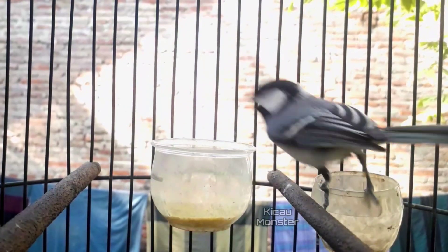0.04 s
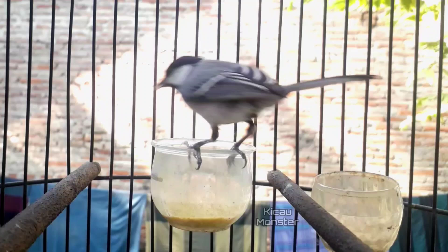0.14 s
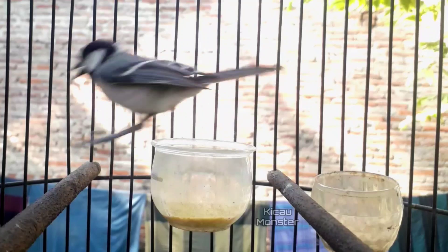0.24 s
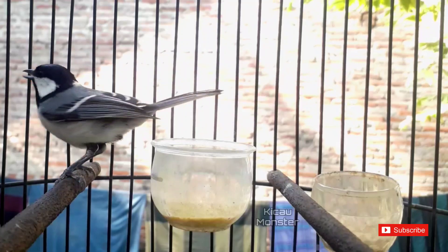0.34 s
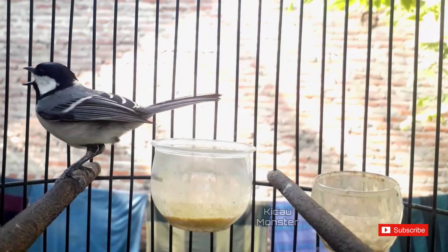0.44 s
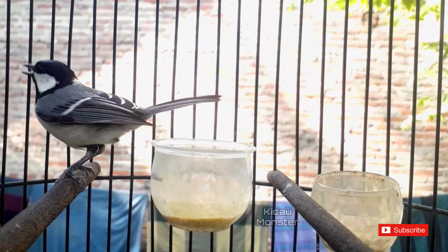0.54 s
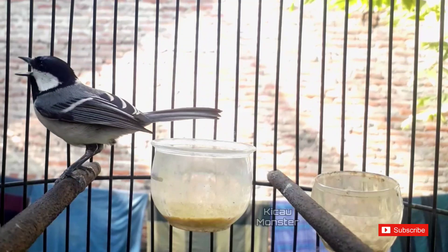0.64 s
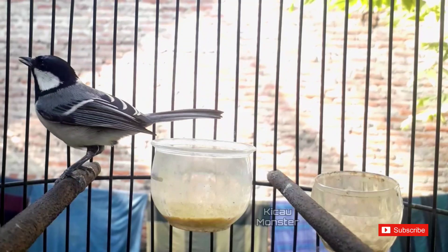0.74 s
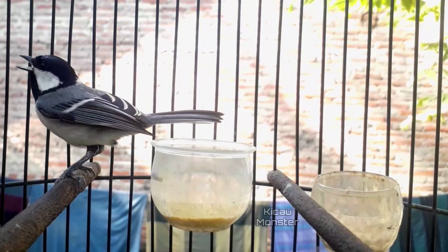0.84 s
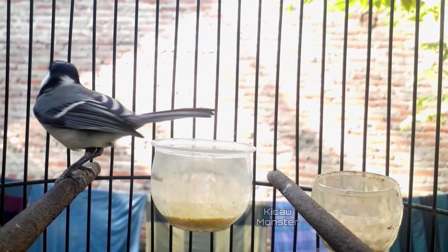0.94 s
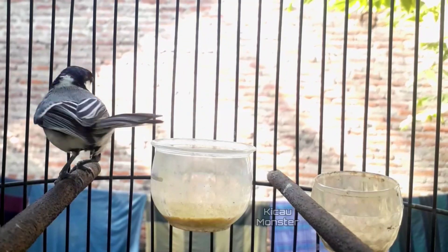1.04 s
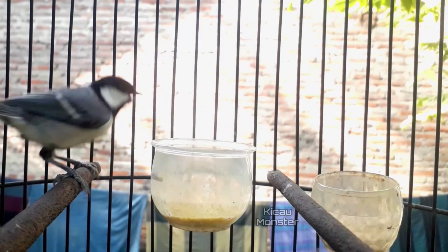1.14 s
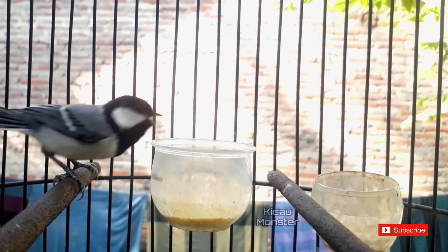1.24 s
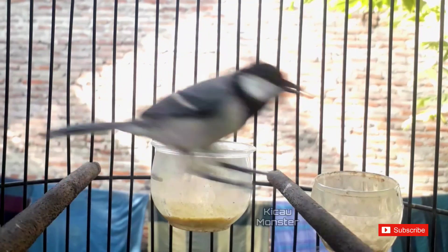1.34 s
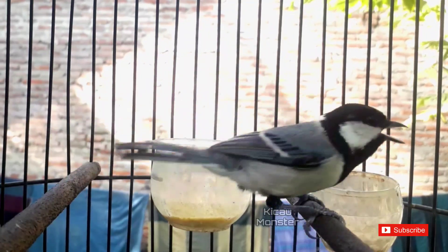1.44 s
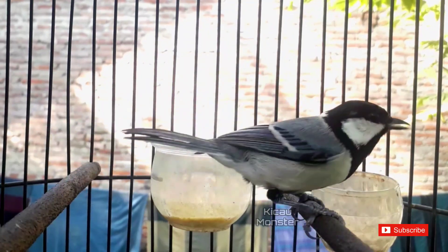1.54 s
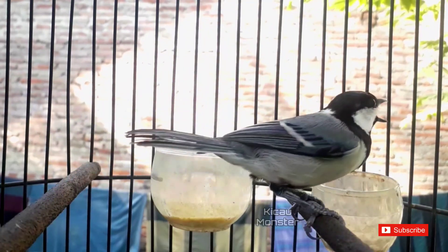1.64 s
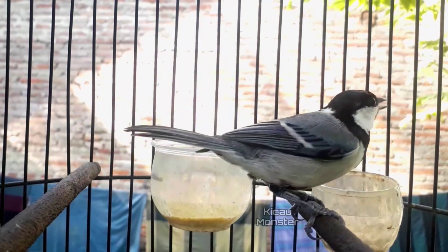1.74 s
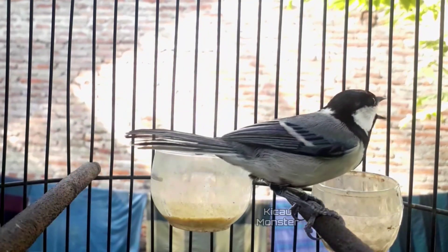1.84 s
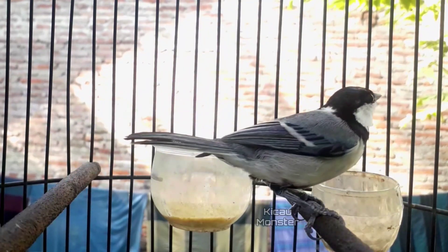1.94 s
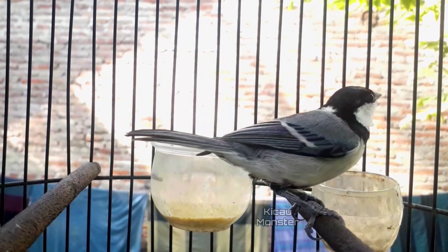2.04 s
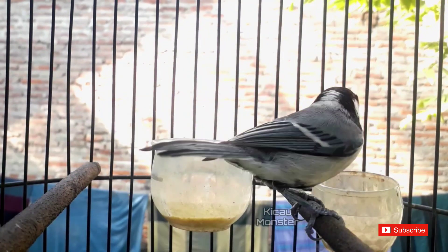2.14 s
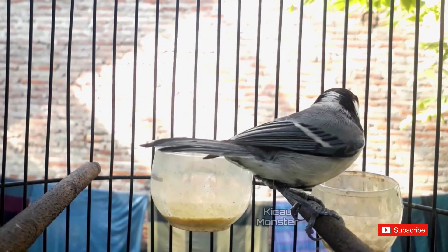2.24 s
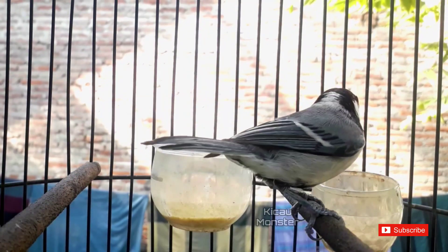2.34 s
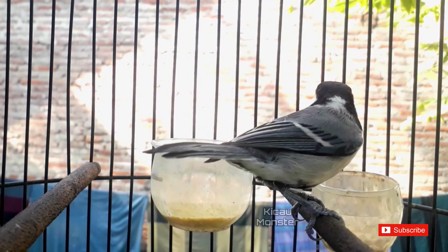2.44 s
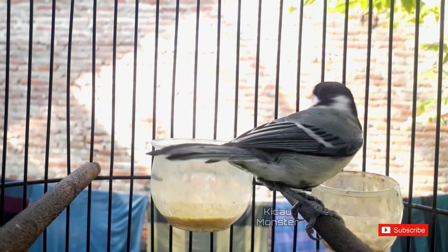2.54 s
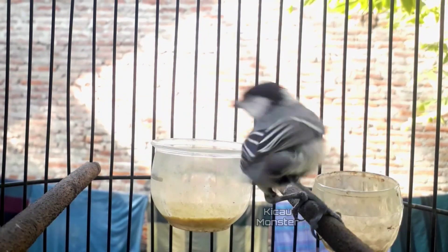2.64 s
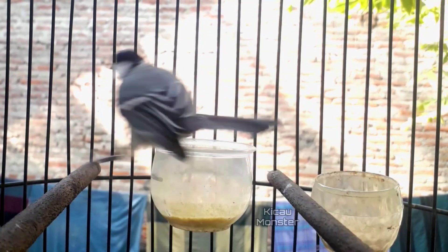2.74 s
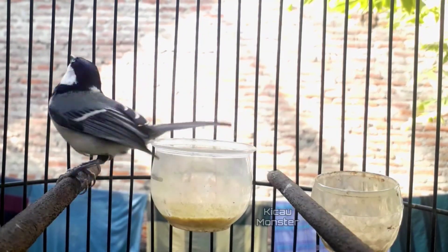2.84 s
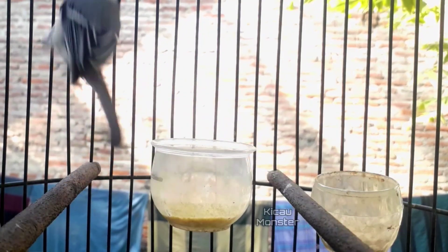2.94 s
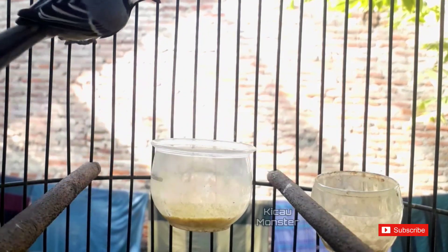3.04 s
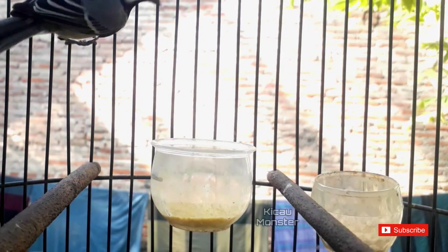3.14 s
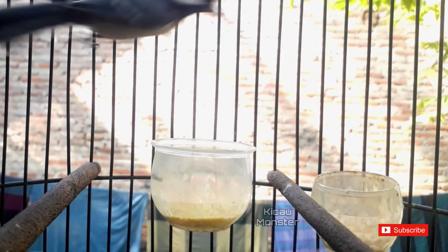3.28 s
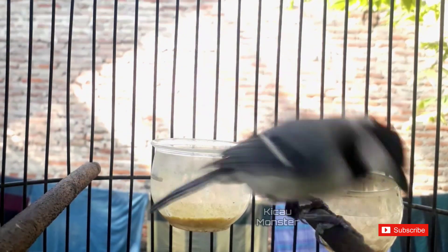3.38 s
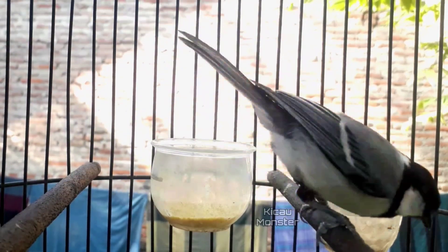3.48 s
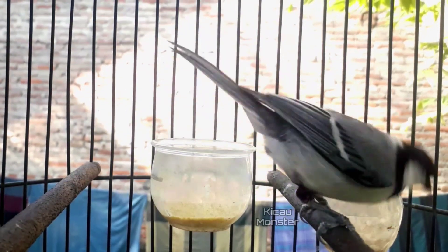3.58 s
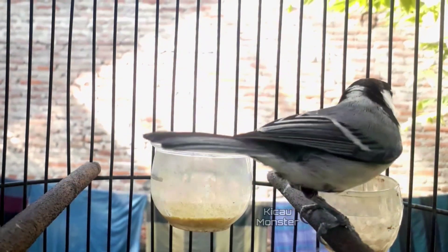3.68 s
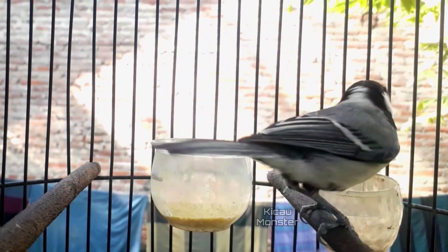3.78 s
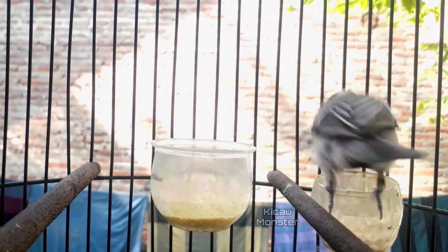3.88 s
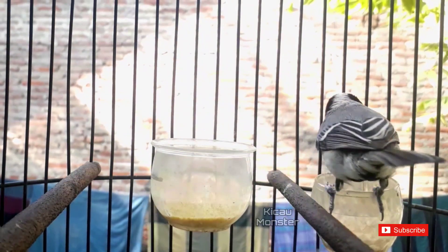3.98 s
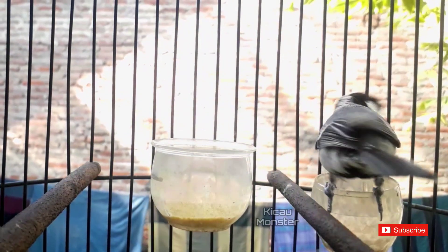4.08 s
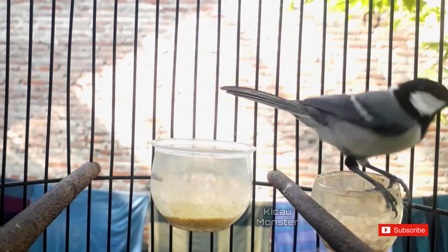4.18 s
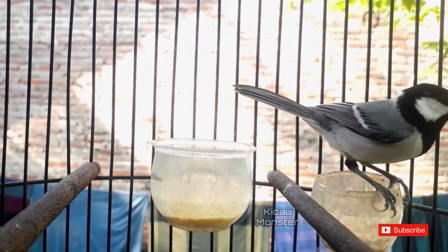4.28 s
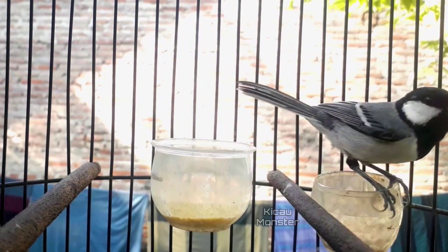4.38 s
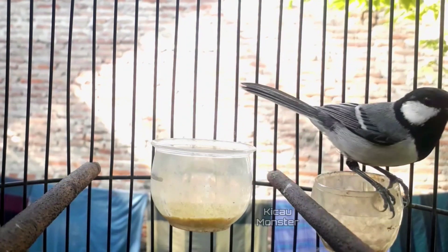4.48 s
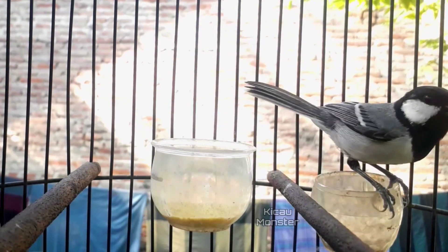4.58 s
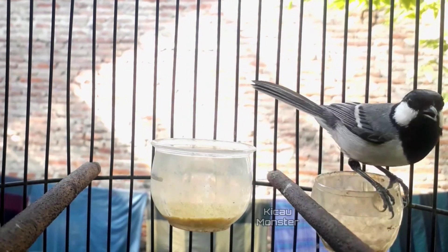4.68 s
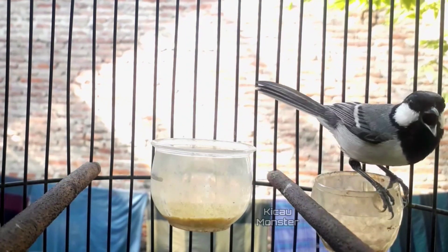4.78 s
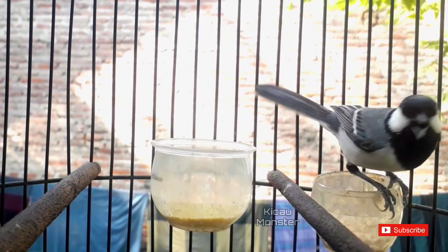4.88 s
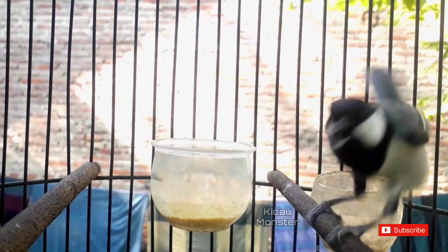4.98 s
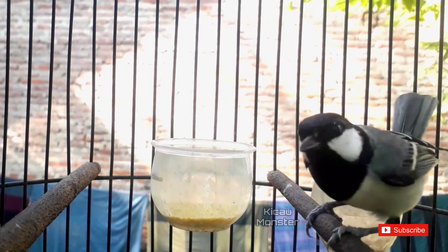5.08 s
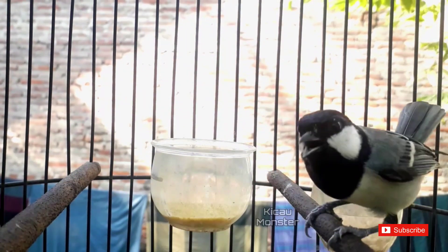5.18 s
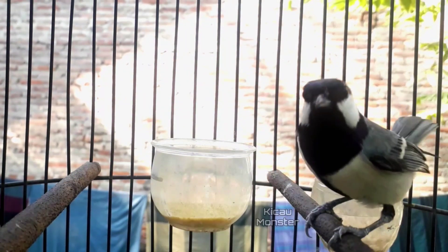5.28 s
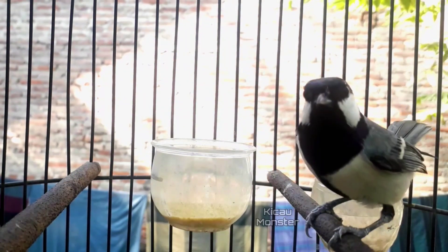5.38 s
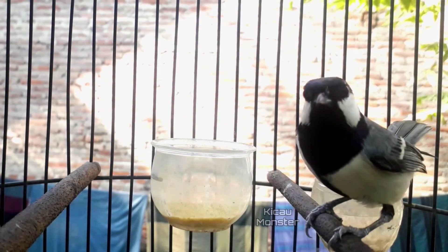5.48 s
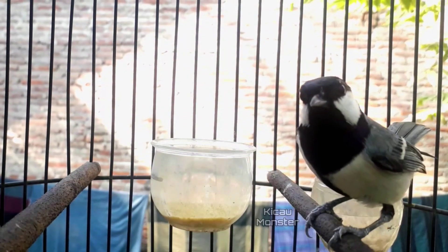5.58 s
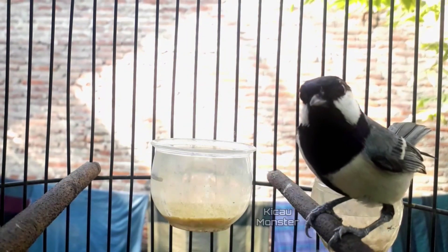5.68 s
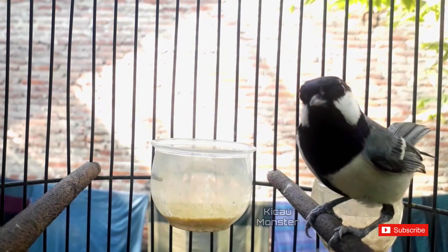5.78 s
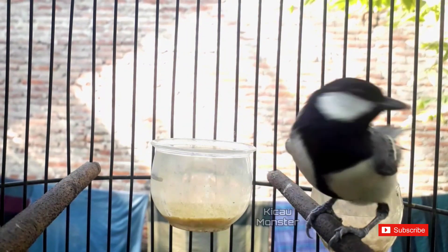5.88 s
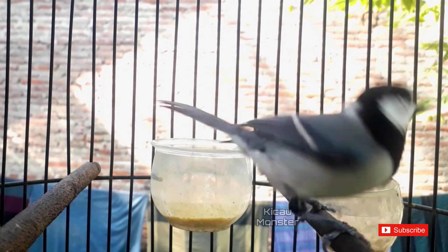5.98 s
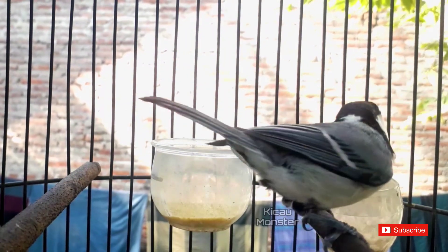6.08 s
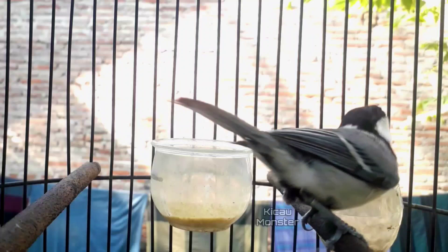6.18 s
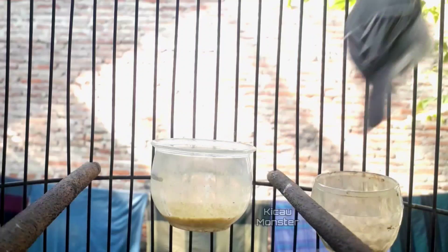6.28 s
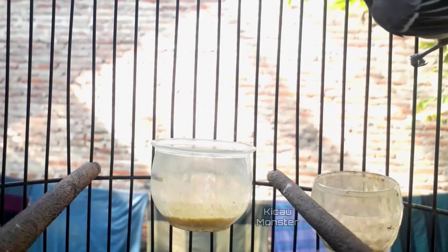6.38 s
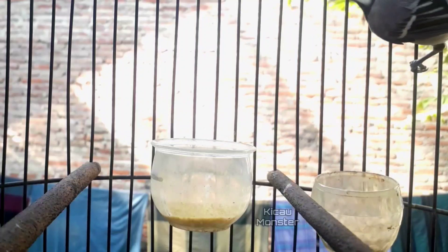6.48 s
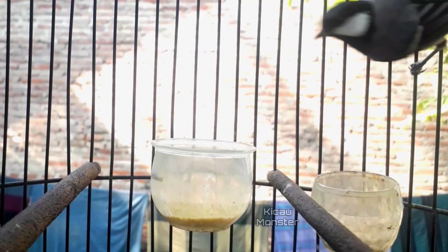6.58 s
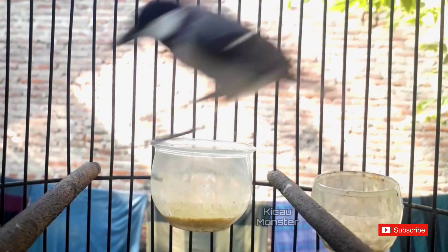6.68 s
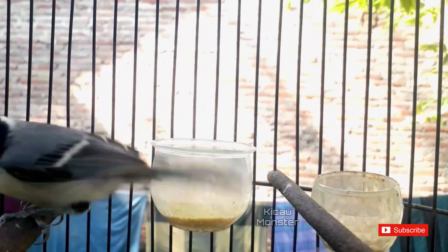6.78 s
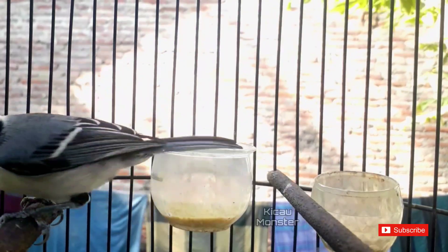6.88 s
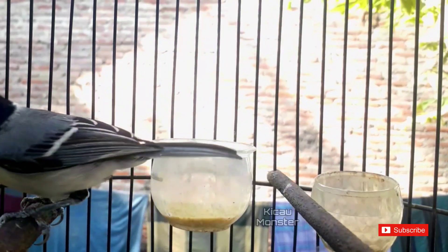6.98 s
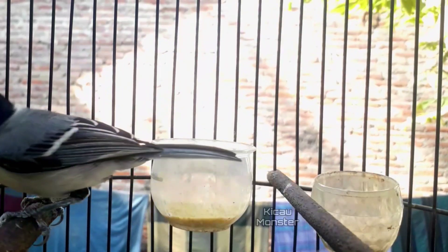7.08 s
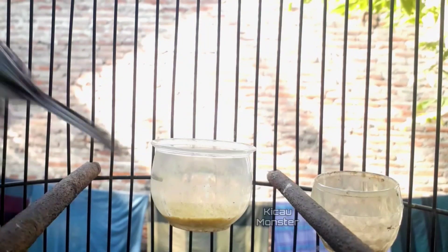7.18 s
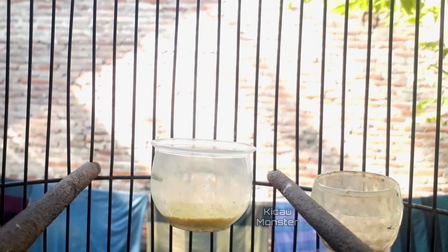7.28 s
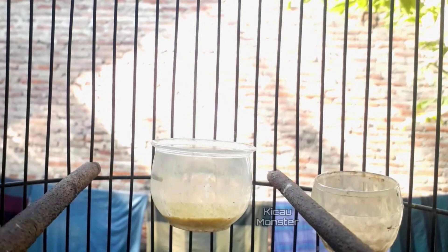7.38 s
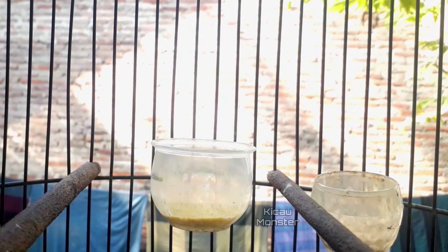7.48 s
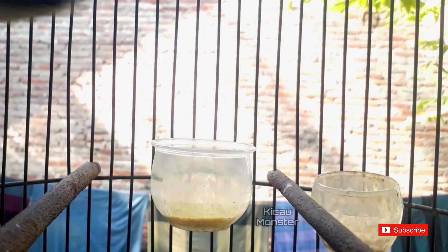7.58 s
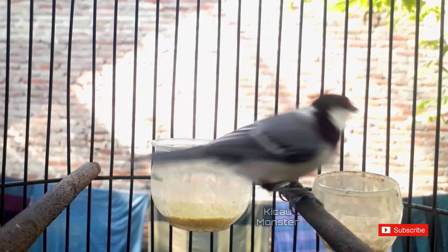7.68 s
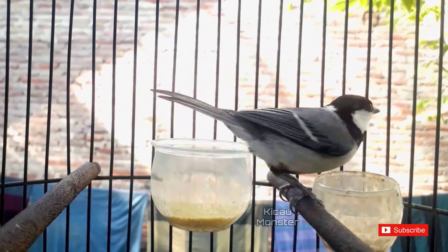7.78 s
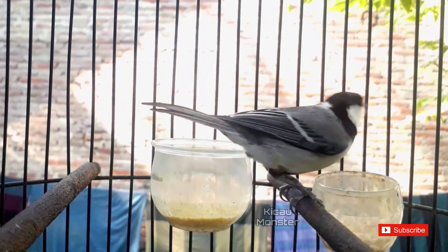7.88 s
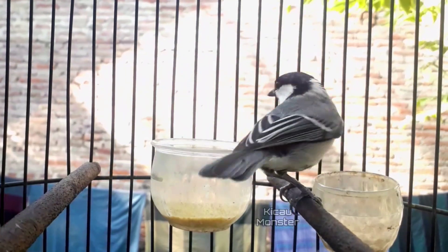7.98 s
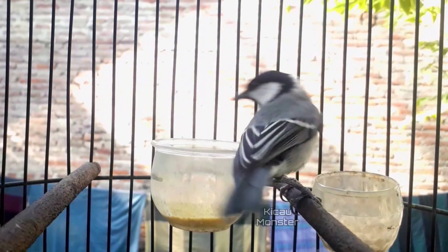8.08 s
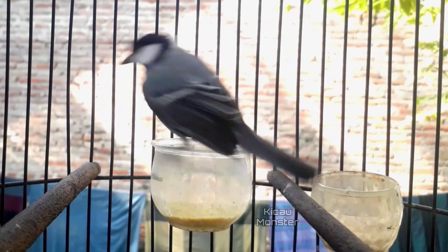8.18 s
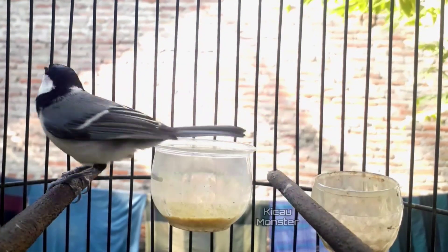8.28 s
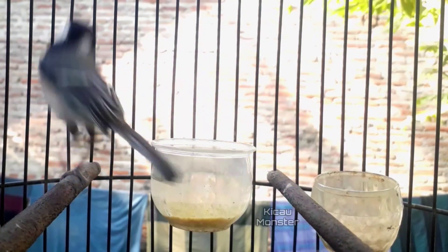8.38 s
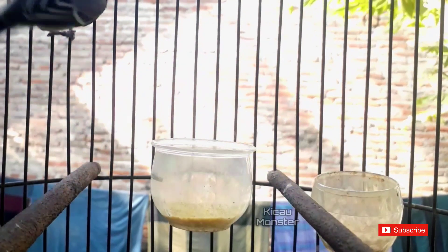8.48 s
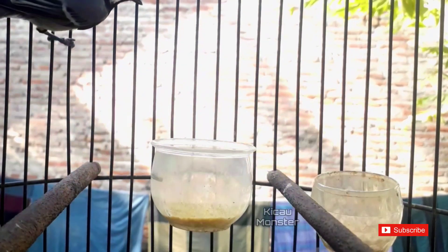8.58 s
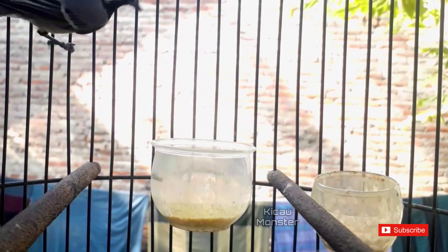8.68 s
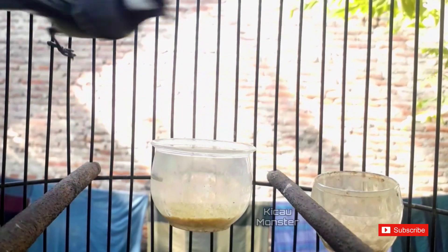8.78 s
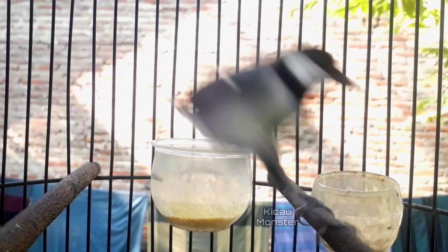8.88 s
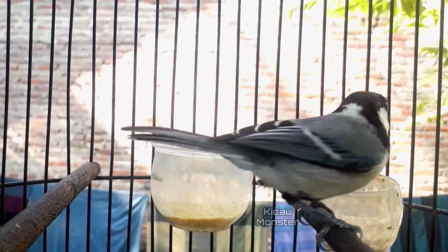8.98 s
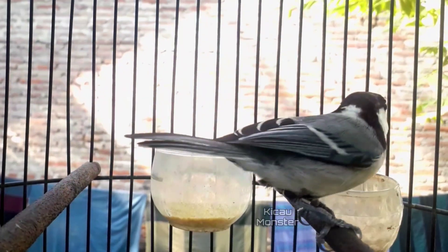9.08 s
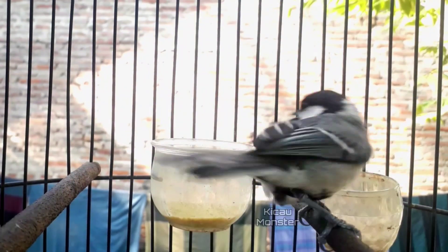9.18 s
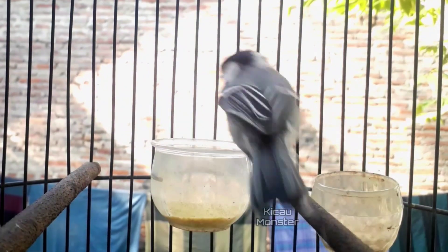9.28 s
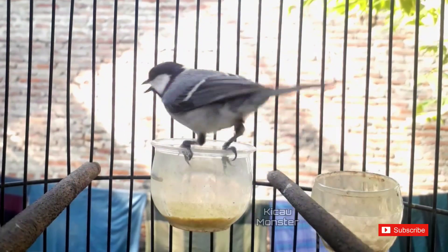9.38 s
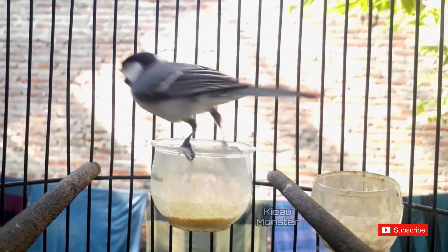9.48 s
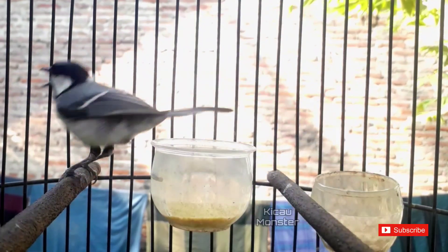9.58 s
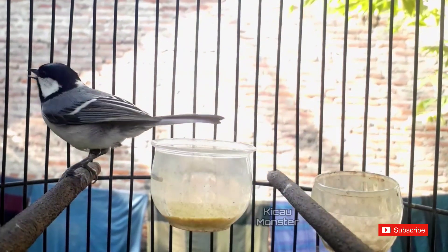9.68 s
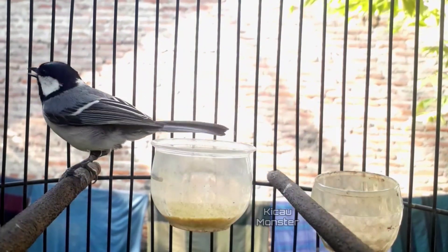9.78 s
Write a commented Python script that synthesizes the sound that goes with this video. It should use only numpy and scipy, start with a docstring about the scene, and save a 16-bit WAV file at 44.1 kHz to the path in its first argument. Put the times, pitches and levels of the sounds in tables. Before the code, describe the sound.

A small bird in a wire cage whistles a high, sliding three-note phrase three times, very close to the microphone and slightly distorted. It pauses and hops about, knocking the perches and shaking the wires, then sings for another second. More hops and a few claw ticks follow while two birds call faintly far off. It sings once more at the end. Soft yard rumble and leaf hiss continue underneath.

```python
"""Over yard rumble and leaf hiss, a tit in a wire cage whistles a three-note phrase again and again,
so close to a phone that the left microphone clips. Its hops knock the perches and shake the wires.
After 2 s it pauses; a claw ticks on wire, a low hum swells, and at 4.4 s it sings for a second.
Two far birds call from 6.5 s among more hops and ticks, and at 9 s the tit sings once more."""
import sys
import numpy as np
from scipy import signal
from scipy.fft import rfft, irfft
from scipy.io import wavfile
from scipy.ndimage import uniform_filter1d

SR = 44100
rng = np.random.default_rng(int(sys.argv[2]) if len(sys.argv) > 2 else 0)


def materialize(psi):
    """Save the field psi as 16-bit PCM at rate SR to the path in sys.argv[1].

    A 1-D psi becomes a single channel; in a 2-D psi each row is a channel.
    """
    bounded = np.clip(np.atleast_2d(psi).T, -1, 1)
    quanta = np.round(bounded * 32767).astype(np.int16)
    wavfile.write(sys.argv[1], SR, quanta)


N = 433503


def undb(db):
    """Turn decibels into a factor to multiply by."""
    return 10 ** (np.asarray(db) / 20)


def unit(x):
    """Scale a signal to an average power of 1."""
    return x / np.sqrt(np.mean(x ** 2))


def smooth(x, samples):
    """Round off corners by averaging twice."""
    return uniform_filter1d(uniform_filter1d(x, samples), samples)


def wander(rate_hz):
    """A smooth random curve, mostly within -1 to 1, that heads for rate_hz new values a second."""
    hold = int(SR / rate_hz)
    steps = np.repeat(rng.standard_normal(N // hold + 1), hold)
    return 1.15 * smooth(steps, hold)[:N]


def ring(x, modes):
    """Let x ring at each mode, a pitch that a thing likes to shake at: f/Hz, width/Hz, level/dB."""
    rings = []
    for hz, width, db in modes:
        peak = signal.iirpeak(hz, hz / width, SR)
        rings.append(undb(db) * unit(signal.lfilter(*peak, signal.lfilter(*peak, x))))
    return np.array(rings)


def glide(rows, smooth_s):
    """Join a note's points smoothly; give its sample numbers, pitch and gains, faded at both ends."""
    times, *columns = np.transpose(rows)
    span = np.arange(int(times[0] * SR), int(times[-1] * SR))
    hz, *levels = (smooth(np.interp(span / SR, times, c), int(smooth_s * SR)) for c in columns)
    return span, hz, undb(levels) * signal.windows.tukey(len(span), .06)


def stereo_noise(spectrum, flicker_db=1.5, lag_samples=19):
    """Flickering noise: each side has its own part, plus a shared part that reaches the right first."""
    freqs = np.maximum(np.fft.rfftfreq(N + 1, 1 / SR), 1)
    hz, db, pan_db, likeness = np.transpose(spectrum)
    curve = lambda values, edge=None: np.interp(np.log(freqs), np.log(hz), values, edge, edge)
    flicker = undb(flicker_db * np.append(wander(11), 0))
    shared, *own = rfft(rng.standard_normal((3, N + 1)) * flicker)
    shared = np.array([shared * np.exp(-2j * np.pi * freqs * lag_samples / SR), shared])
    mix = np.sqrt(curve(likeness)) * shared + np.sqrt(1 - curve(likeness)) * np.array(own)
    colour = undb(curve(db, edge=-78) + np.array([curve(pan_db), -curve(pan_db)]) / 2)
    return unit(irfft(mix * colour)[:, :N])


def yard():
    """Street rumble, cage sway, a mid-pitched rush and leaf hiss, heard at levels that rise and fall."""
    # how loud each layer is: t/s, rumble/dB, sway/dB, rush/dB, hiss/dB
    background_levels = [(0.0, -40.5, -44.5, -39.5, -35.5), (0.3, -48.5, -49, -48.5, -42.5),
                         (0.55, -49.5, -49.5, -53.5, -56), (0.93, -51, -54, -46, -43),
                         (1.67, -49.5, -48.5, -49, -48), (2.3, -58, -64, -55.5, -54.5),
                         (3.12, -54, -53.5, -52, -51.5), (3.86, -54.5, -55.5, -54, -51),
                         (4.5, -54.5, -59, -50, -42.5), (4.9, -52, -56.5, -58, -61),
                         (5.39, -60.5, -60, -64, -67.5), (5.66, -64.5, -63, -65, -67.5),
                         (5.9, -62.5, -62.5, -62, -56.5), (6.4, -60, -56, -56.5, -52),
                         (7.31, -60.5, -55.5, -56.5, -50.5), (7.62, -57, -48, -51.5, -48.5),
                         (7.88, -51.5, -44, -49.5, -43.5), (8.36, -45.5, -39.5, -44, -39),
                         (8.62, -47, -39, -51, -50.5), (8.95, -43, -41, -48.5, -49),
                         (9.2, -53, -54.5, -53, -47.5), (9.83, -50.5, -51, -47, -39.5)]
    # each layer's tone: f/Hz, relative level/dB, left minus right/dB, likeness of the sides (0-1)
    rumble = [(30, -24, -0.5, .9), (60, -4.5, -1.5, .85), (162, -6.5, -1, 0.9), (262, -13, -1, .6),
              (500, -30, -2.5, .5)]
    sway = [(109, -15.5, -7, .4), (224, -2, -12.5, .3), (350, -1, -10, 0.11), (497, -1.5, -9.5, .3),
            (580, -17, -5, .2), (1130, -16, -5.5, .2), (1410, -22, -4, .2)]
    rush = [(556, -10.5, -8, 0.33), (1050, -10, 0, .3), (1720, -10.5, -0.5, .3), (1980, -5, -3.5, 0.25),
            (2600, -2.5, 5, 0.1), (3383, -8, -1, 0.19), (4600, -12, -1.5, .1)]
    hiss = [(3240, -10.5, 0, .1), (4760, -1, -1, 0.056), (6400, -1.5, 0, 0.041), (8700, 3.5, 0, .1),
            (9260, -3.5, 0, .1), (14000, -5, 0, .1), (15500, -4, 0, .1)]
    times, *levels = np.transpose(background_levels)
    t = np.arange(N) / SR
    layers = zip(levels, (rumble, sway, rush, hiss))
    return sum(undb(np.interp(t, times, db)) * stereo_noise(spectrum) for db, spectrum in layers)


def tit():
    """The tit whistles sliding tones with weak overtones; a faint hiss rises and falls with each note."""
    # one list of points per note: t/s, f/Hz, left level/dB, right level/dB
    notes = [
        [(0.083, 5640, -22, -20.5), (0.092, 5890, -1.5, -19), (0.123, 6630, 1, -21), (0.143, 6360, -8, -10),
         (0.176, 5010, -1, -15), (0.181, 4600, -12.5, -20), (0.191, 4470, -18, -18), (0.198, 3940, -24.5, -36)],
        [(0.294, 4110, -27, -18.5), (0.317, 4313, -12, -2.5), (0.332, 4350, -19.5, -4.5), (0.392, 4563, 3, -7),
         (0.417, 4855, -1.5, -16.5), (0.426, 6870, -16.5, -23), (0.428, 6750, -21, -14.5),
         (0.429, 4860, -21.5, -26.5)],
        [(0.513, 6610, -18.5, -24), (0.529, 7020, 4, -9.5), (0.539, 8290, 1, -3.5), (0.547, 9130, -15, -15),
         (0.584, 8650, -2.5, -5.5), (0.601, 7950, 5.5, -4), (0.609, 7110, -16, -21),
         (0.618, 7040, -22.5, -34.5)],
        [(0.675, 5650, -23, -26), (0.685, 5790, -10, -14.5), (0.718, 6705, 1, -10.5),
         (0.729, 6730, -5.5, -10.5), (0.749, 6060, -1, -7), (0.776, 5110, 4, -5.5), (0.793, 4630, -16, -19),
         (0.804, 3900, -22.5, -19.5)],
        [(0.893, 3980, -24.5, -26.5), (0.905, 4236, -9, -12), (0.938, 4424, -3.5, -0.5),
         (1.011, 4636, 0.5, -8.5), (1.029, 5070, -5, -13), (1.036, 6580, -17.5, -23.5), (1.038, 6800, -7, -19),
         (1.04, 5220, -10.5, -16.5)],
        [(1.111, 6210, -25.5, -30), (1.128, 7260, 7.5, -9.5), (1.149, 9270, -17, -15), (1.18, 8310, 0, -4),
         (1.195, 7260, -5.5, -13), (1.201, 7400, -11.5, -32.5), (1.202, 7040, -12, -30),
         (1.205, 7000, -19.5, -29)],
        [(1.262, 5700, -28.5, -32.5), (1.276, 5910, -6.5, -10.5), (1.289, 6300, -5, -11),
         (1.292, 6420, -9, -25.5), (1.302, 6720, 2.5, -8.5), (1.324, 6560, 2, -31), (1.38, 4260, -3.5, -16),
         (1.392, 3630, -23, -17)],
        [(1.474, 3793, -21, -30.5), (1.479, 3980, -20.5, -28.5), (1.489, 4170, -6.5, -20.5),
         (1.506, 4313, -2, -5.5), (1.595, 4560, -1.5, -15.5), (1.612, 4980, -2, -19.5),
         (1.62, 6370, -10, -20.5), (1.624, 6300, -17, -18)],
        [(1.708, 6350, -13.5, -31.5), (1.716, 6520, -10.5, -17.5), (1.734, 7710, 7, -9.5),
         (1.744, 9140, -23.5, -29), (1.767, 8600, -11.5, -16.5), (1.785, 8575, -3.5, 2.5),
         (1.797, 7420, 1, -22), (1.803, 7500, -24, -16)],
        [(1.873, 5420, -21, -23), (1.886, 5730, -9, -28), (1.897, 6190, -2.5, -23), (1.927, 6710, 4.5, -16.5),
         (1.957, 5970, -4, -16), (1.963, 5660, -1, -18), (1.979, 5040, -6.5, -18), (2.004, 4000, -12, -13.5)],
        [(4.382, 5680, -15.5, -25), (4.398, 6050, 2, -10), (4.439, 6670, -1.5, -11.5),
         (4.467, 5430, -1.5, -27.5), (4.476, 5100, -5.5, -11.5), (4.483, 4870, -9.5, -20),
         (4.494, 4400, -5.5, -10.5), (4.516, 3660, -18.5, -23)],
        [(4.607, 4055, -20.5, -27), (4.626, 4223, -4, -16.5), (4.675, 4400, 0.5, -8), (4.726, 4600, -1, -5.5),
         (4.74, 5000, -3, -9.5), (4.747, 6930, -6, -28), (4.75, 6500, -3, -31.5), (4.751, 5620, -8.5, -22)],
        [(4.821, 6230, -21.5, -26), (4.826, 6590, -6.5, -25), (4.84, 7300, 2.5, -19.5),
         (4.853, 8970, -13.5, -17.5), (4.864, 9160, -19, -15.5), (4.906, 8140, -1.5, -12),
         (4.916, 7120, -0.5, -16), (4.919, 7400, -24, -15)],
        [(4.981, 5420, -25, -29.5), (4.993, 5810, -4.5, -25.5), (5.012, 6350, -3.5, -12),
         (5.019, 6380, -6.5, -20), (5.038, 6736, 3.5, -8.5), (5.08, 5310, 0.5, -33), (5.093, 4810, -3.5, -11),
         (5.114, 3740, -29.5, -26.5)],
        [(5.205, 3930, -17, -28), (5.221, 4323, -8.5, -19.5), (5.244, 4333, -1, -7.5), (5.33, 4650, -8, -25),
         (5.343, 4970, -7.5, -29), (5.351, 6030, -9.5, -13), (5.354, 5800, -26, -52), (5.355, 4630, -25, -25)],
        [(9.065, 5710, -25, -41.5), (9.068, 5810, 5.5, -21), (9.08, 6170, -5.5, -14), (9.113, 6730, 5, -17.5),
         (9.137, 5890, -4.5, -30), (9.142, 5690, -0.5, -12), (9.161, 4980, -4.5, -14), (9.189, 3880, -17, -26)],
        [(9.281, 4016, -20.5, -42), (9.308, 4327, 0, -7), (9.398, 4670, -6, -28), (9.407, 4850, -0.5, -2.5),
         (9.412, 5170, -8.5, -7), (9.417, 6640, -3, -25), (9.419, 6830, -26, -30), (9.421, 5230, -18, -29)],
        [(9.492, 6330, -20, -27), (9.506, 7140, 2.5, -30), (9.521, 8700, -33, -12), (9.53, 9240, -12.5, -21),
         (9.566, 8630, -14, -8.5), (9.584, 7470, 5, -27), (9.591, 7000, -38, -40), (9.593, 7210, -28, -30)],
        [(9.656, 5810, -20, -25), (9.67, 6100, -9, -22), (9.684, 6450, -0.5, -18), (9.705, 6786, -5, -1.5),
         (9.72, 6390, -0.5, -2), (9.726, 6210, -14.5, -30), (9.758, 5140, 0, -7.5), (9.783, 4050, -27, -30)],
    ]
    # the bird moves between notes: delay of left behind right/samples
    lags = [-22.5, 15.0, 1.5, -19, 6.0, 1, -14.5, -24, -3, -15.0, -16.5, -16.0, -11.0, -22.5, -29, -14.5,
            17.5, -11.5, -11.5]
    # higher tones in the whistle: multiple of the pitch, level/dB
    overtones = [(2, -27.5), (3, -37.5)]
    note_hiss = ring(rng.standard_normal((2, N)), [(5930, 6000, 2.5), (12000, 6900, -3.5)]).sum(0)
    song = np.zeros((2, N))
    for rows, lag in zip(notes, lags):
        span, hz, gain = glide(rows, smooth_s=.004)
        phase = 2 * np.pi * (np.cumsum(hz) - np.array([lag * hz, 0 * hz])) / SR
        upper = sum(undb(db) * np.sin(k * phase) * (k * hz < .45 * SR) for k, db in overtones)
        effort = np.minimum(gain.max(0), 1) ** .5  # louder notes have stronger overtones
        song[:, span] = gain * (np.sin(phase) + effort * upper + undb(-41) * note_hiss[:, span])
    # sound hits the cage and walls from all sides, so both channels feed each echo
    return song + echoes(song + .3 * song[::-1], tail_db=-28.5, early_db=-18)


def echoes(x, tail_db, early_db):
    """Sound bounces off the cage at once, then dies away between the walls, differently on each side."""
    t = np.arange(SR // 2) / SR
    early = np.exp(-t / .01) * (t > .0005)
    tail = np.exp(-np.log(1000) * t / .32) * (t > .002)  # falls 60 dB in 0.32 s
    shape = undb(tail_db) * tail / np.linalg.norm(tail) + undb(early_db) * early / np.linalg.norm(early)
    return signal.fftconvolve(x, shape * rng.standard_normal((2, len(t))), axes=1)[:, :N]


def favour(rings, modes, hz, db_per_octave):
    """Mix the ringing modes; the spot where the bird lands favours those near one pitch."""
    octaves_away = abs(np.log2(np.array(modes)[:, 0] / hz))
    return np.tensordot(undb(-db_per_octave * octaves_away), rings, 1)


def hops():
    """Each landing makes the perch thud and the wires jingle, loudest at the right microphone."""
    # t/s, level/dB, jingle against thud/dB, favoured perch f/Hz, favoured wire f/Hz, thud fade time/s
    landings = [(0.398, -28.5, -9.5, 216, 2030, 0.31), (1.124, -36, -11, 277, 1194, 0.41),
                (2.87, -34.5, -11.5, 183, 1140, 0.31), (3.077, -39.5, -3.5, 226, 1300, 0.37),
                (3.392, -33.5, -22, 231, 1920, 0.28), (3.472, -31, -19, 231, 1140, 0.45),
                (3.999, -40, -11.5, 153, 1860, 0.31), (4.301, -39, -20, 229, 1973, 0.34),
                (6.022, -46, -18.5, 234, 1900, 0.34), (6.084, -35, -28, 236, 991, 0.31),
                (6.329, -45.5, -19, 221, 1140, 0.34), (6.416, -38.5, -11.5, 221, 1020, 0.41),
                (6.821, -38.5, -6.5, 388, 1120, 0.33), (7.346, -39.5, -1, 168, 1140, 0.54),
                (7.662, -40, -17, 312, 1040, 0.37), (7.766, -25, -14, 220, 1140, 0.46),
                (8.279, -31.5, -17, 229, 1030, 0.3), (8.328, -28.5, -7.5, 176, 1120, 0.41),
                (8.565, -24, -7.5, 328, 1170, 0.4), (8.914, -27.5, -8.5, 318, 1090, 0.55),
                (8.995, -22.5, -17, 292, 1060, 0.35)]
    # how the perch and the wires ring: f/Hz, width/Hz, level/dB
    perch_modes = [(95, 31, -4), (154, 69, 1.5), (228, 35, 0), (335.5, 120, 1.5), (470, 66, -1.5)]
    wire_modes = [(987, 100, -8), (1117, 110, -2), (1209.7, 62, -12), (1920, 290, -6), (2555, 200, -10.5),
                  (3900, 900, -14.5)]
    rattle = rng.standard_normal((4, N)) * undb(2.5 * wander(60))
    perch = ring(rattle[:2], perch_modes) * undb([[-17], [0]])
    wires = ring(rattle[2:], wire_modes) * undb([[-1], [0]])
    out = np.zeros((2, N))
    for start, db, jingle_db, perch_hz, wire_hz, fade_s in landings:
        span = np.arange(int(start * SR), N)[:SR // 2]
        t = (span - span[0]) / SR
        blow = .8 + .74 * np.exp(-t / .018)  # the hit stands out over the rattle that follows
        fade = np.exp(-np.log(1000) * t / fade_s) * blow
        # the heavy perch starts slowly; the light wires start at once and ring longer
        rise = 1 - np.exp(-t / .0094)
        thud = favour(perch[:, :, span], perch_modes, perch_hz, db_per_octave=8) * fade * rise
        jingle = favour(wires[:, :, span], wire_modes, wire_hz, db_per_octave=4.6) * fade ** .66
        out[:, span] += undb(db) * (thud + undb(jingle_db) * jingle)
    return out


def claw_ticks():
    """A claw hits a wire: a short bright click, then a faint rattle."""
    # claw hits: t/s, level/dB
    hits = [(2.8349, -28), (6.821, -36.5), (8.5636, -30.5)]
    t = np.arange(SR // 10) / SR
    click = np.exp(-t / .0029) + .35 * np.exp(-t / .039)
    loudness = np.zeros(N)
    for start, db in hits:
        loudness[int(start * SR):][:len(t)] += undb(db) * click
    return loudness * ring(rng.standard_normal((2, N)), [(8660, 2900, -6), (11750, 6900, -9)]).sum(0)


def distant_tones(notes, flutter_db, wobble_cycles, rate_hz):
    """Tones from far away: echoes make their level and phase waver, differently on each side."""
    out = np.zeros((2, N))
    waver = np.array([wander(rate_hz) for _ in range(4)])
    for rows in notes:
        span, hz, gain = glide(rows, smooth_s=.016)
        phase = 2 * np.pi * (np.cumsum(hz) / SR + wobble_cycles * waver[2:, span])
        out[:, span] += gain * undb(flutter_db * waver[:2, span]) * np.sin(phase)
    return out


def low_hum():
    """A faint low hum swells for half a second, wavering slowly."""
    # points along the hum: t/s, f/Hz, level/dB
    points = [(3.6, 151, -47.5), (3.75, 154.4, -52), (4.0, 155, -44.5), (4.12, 150, -54.5)]
    return distant_tones([points], flutter_db=1.5, wobble_cycles=.076, rate_hz=12)


def far_birds():
    """Two birds call far off to the left; their sound arrives mostly as echo."""
    # one list of points per note: t/s, f/Hz, level/dB
    notes = [
        [(6.46, 5560, -55.5), (6.55, 5600, -53), (6.68, 5770, -62)],
        [(6.69, 6400, -60), (6.77, 6530, -54), (6.86, 6490, -66)],
        [(6.85, 2900, -60), (6.9, 3350, -57.5), (6.95, 3300, -80.5)],
        [(6.99, 2950, -61), (7.03, 3400, -55), (7.06, 3300, -72)],
        [(7.0, 2750, -59), (7.1, 2610, -59.5), (7.26, 2640, -60)],
        [(7.13, 3000, -59), (7.17, 3400, -52), (7.22, 3300, -76)],
        [(7.27, 2950, -61), (7.32, 3300, -49), (7.38, 3200, -65)],
        [(7.41, 3000, -55), (7.46, 2600, -53.5), (7.5, 2100, -57)],
    ]
    calls = distant_tones(notes, flutter_db=3, wobble_cycles=.17, rate_hz=250)
    return (calls + echoes(calls, tail_db=-6.5, early_db=5)) * undb([[2.75], [-2.75]])


def scene():
    """Add up all the sounds at the left and right microphones."""
    return yard() + tit() + hops() + claw_ticks() + low_hum() + far_birds()


def record(dry):
    """The phone's amplifier flattens the loudest peaks, a little unevenly; the highest treble is cut."""
    gain_db, clip_sharpness, top_hz = 2.23, 14, 15700
    loud = undb(gain_db) * dry
    flattened = loud / (1 + abs(loud) ** clip_sharpness) ** (1 / clip_sharpness)
    lopsided = flattened - .037 * flattened ** 8
    treble_cut = signal.ellip(8, .2, 45, top_hz, fs=SR, output="sos")
    return np.clip(signal.sosfilt(treble_cut, lopsided), -1, 1)


dry = scene()
out = record(dry)
materialize(out)
```